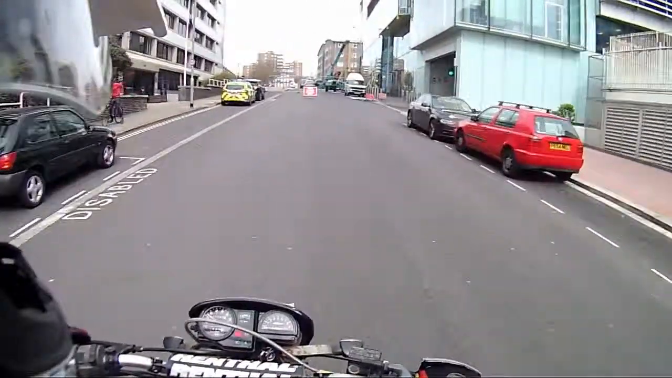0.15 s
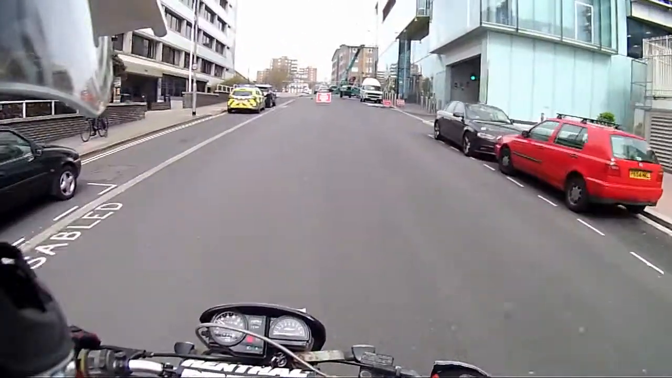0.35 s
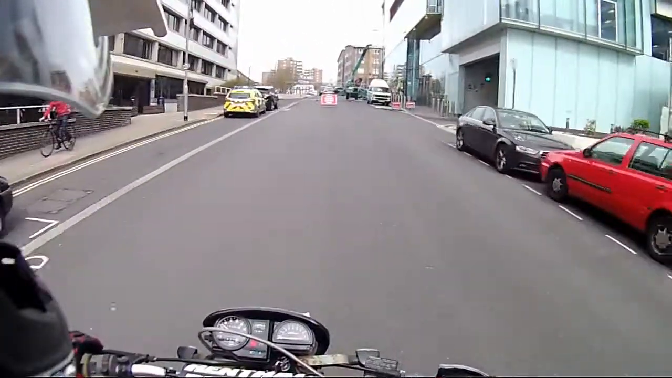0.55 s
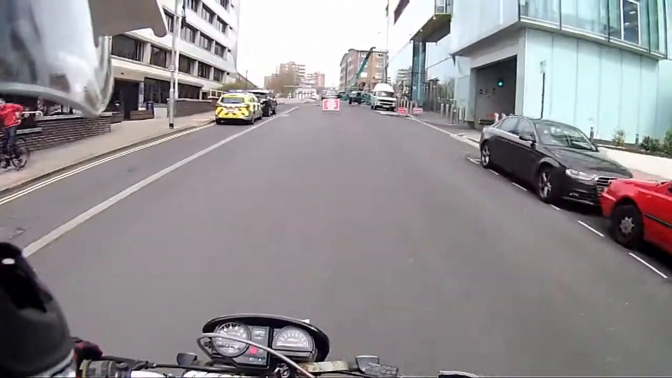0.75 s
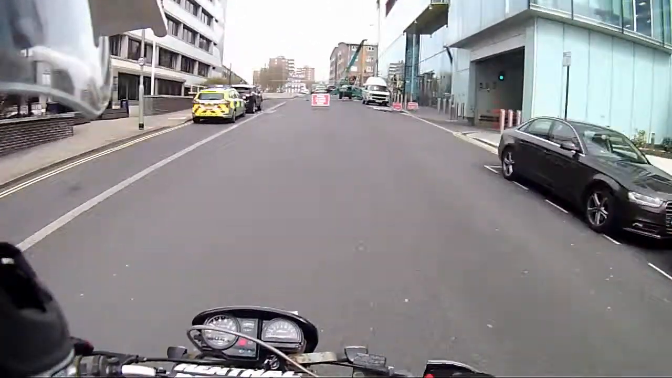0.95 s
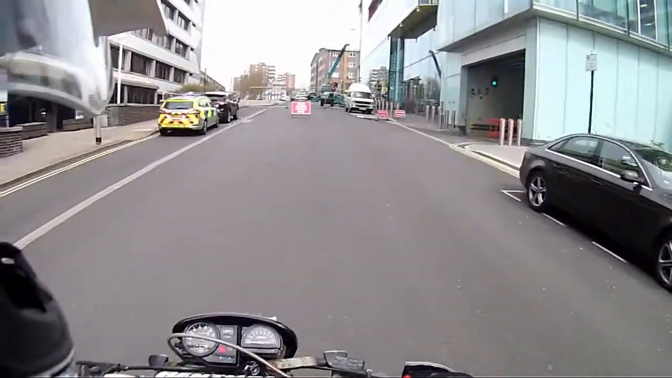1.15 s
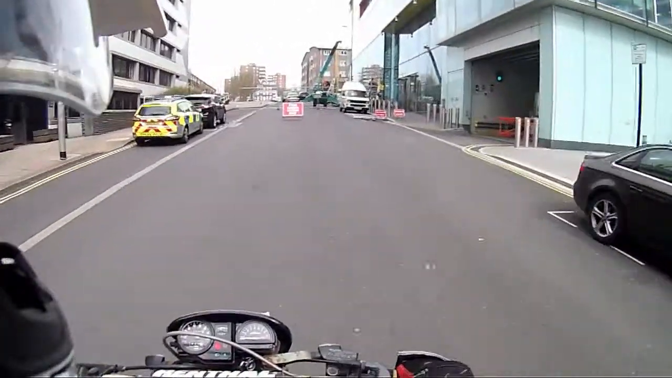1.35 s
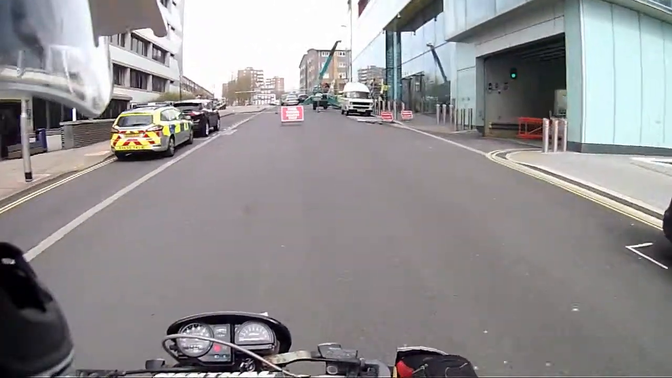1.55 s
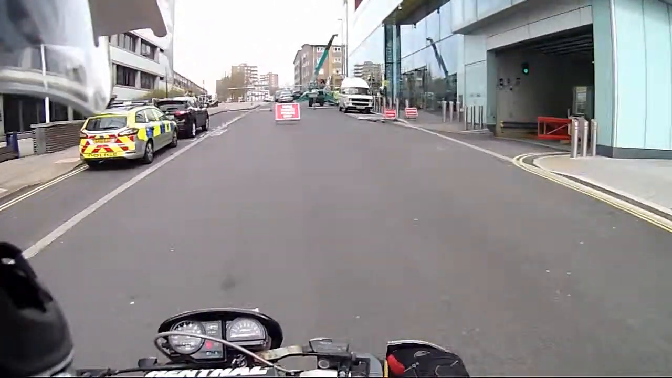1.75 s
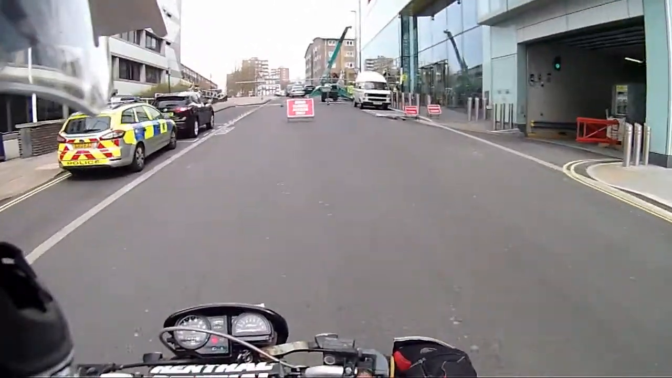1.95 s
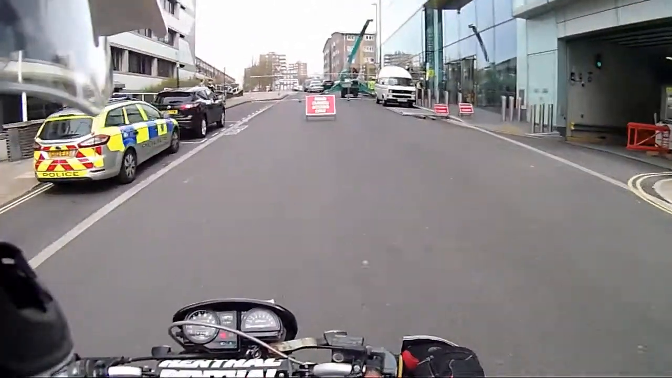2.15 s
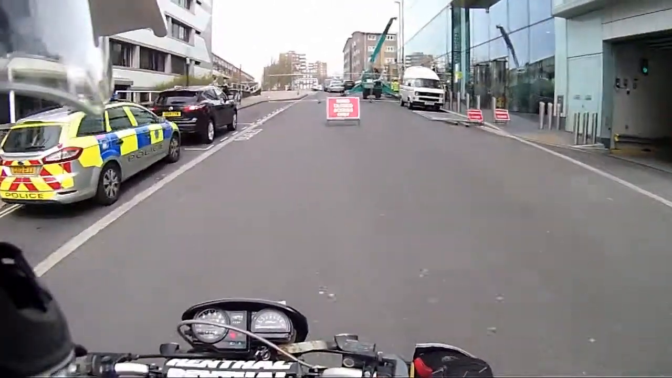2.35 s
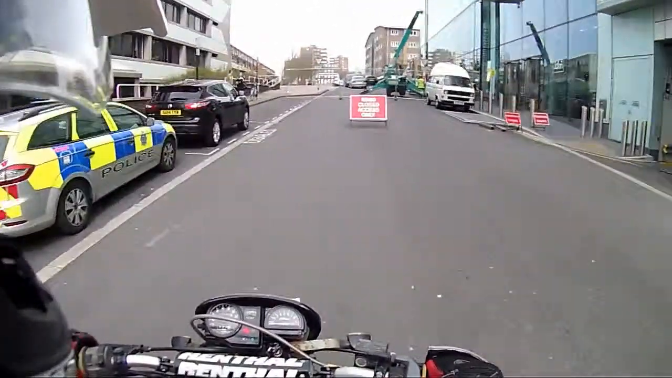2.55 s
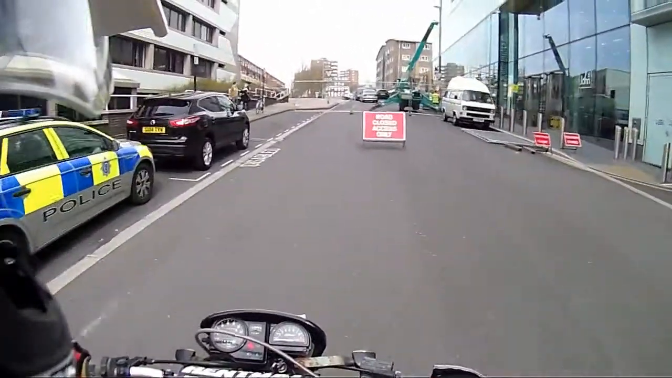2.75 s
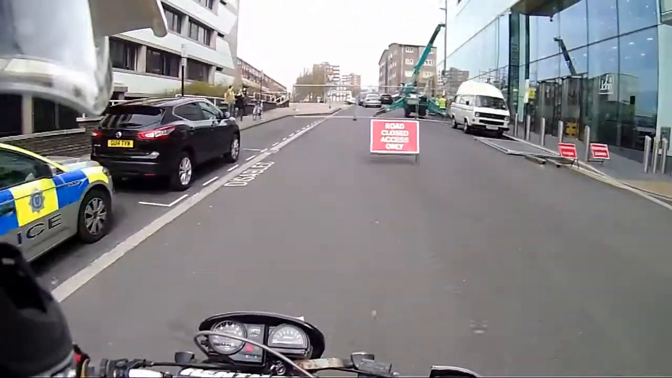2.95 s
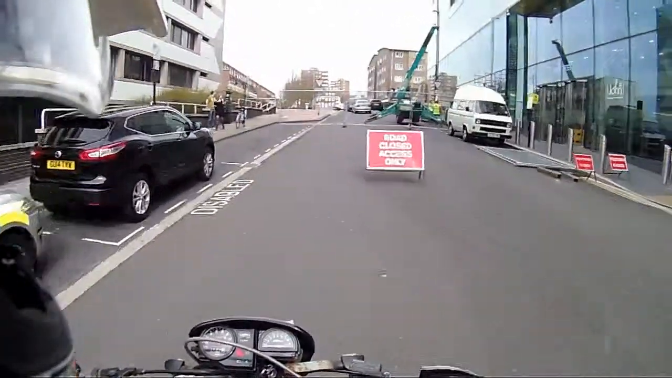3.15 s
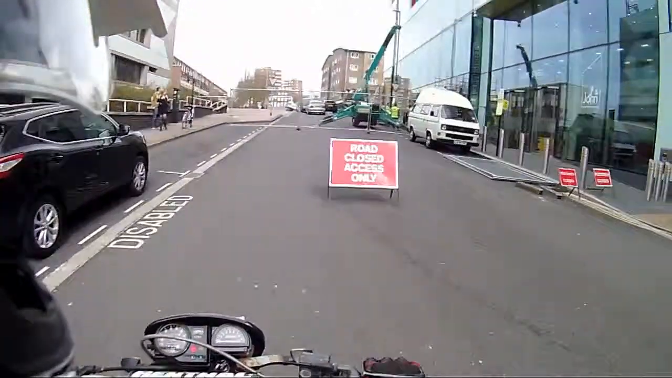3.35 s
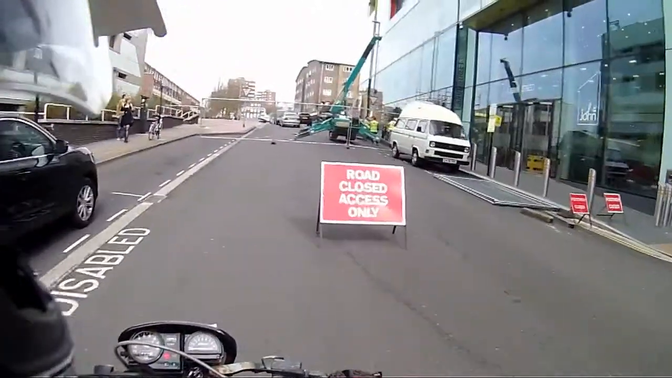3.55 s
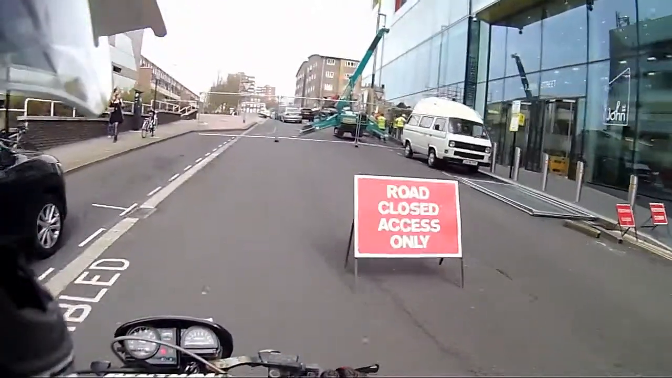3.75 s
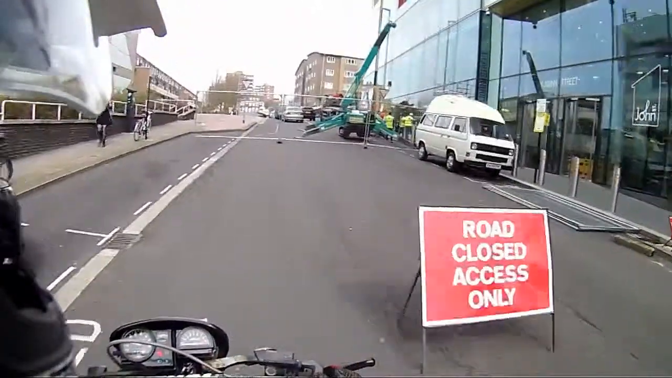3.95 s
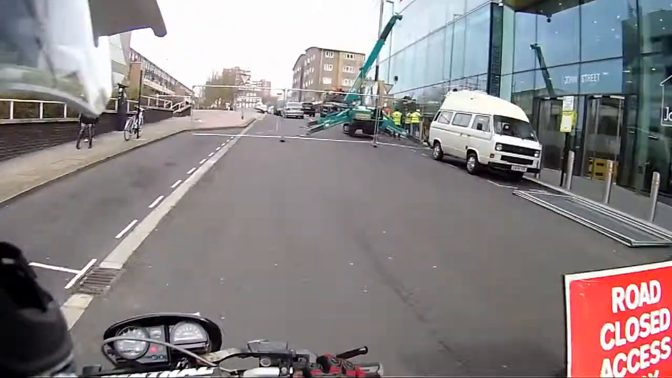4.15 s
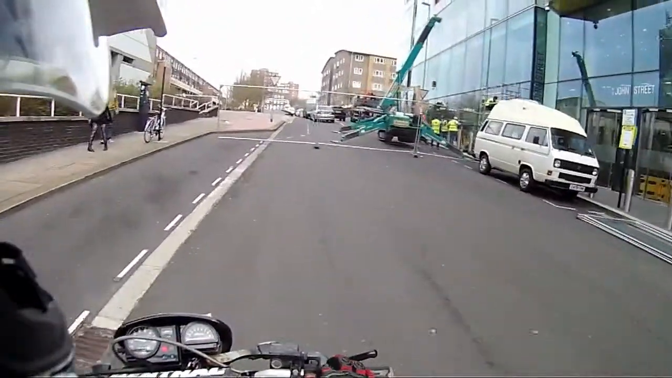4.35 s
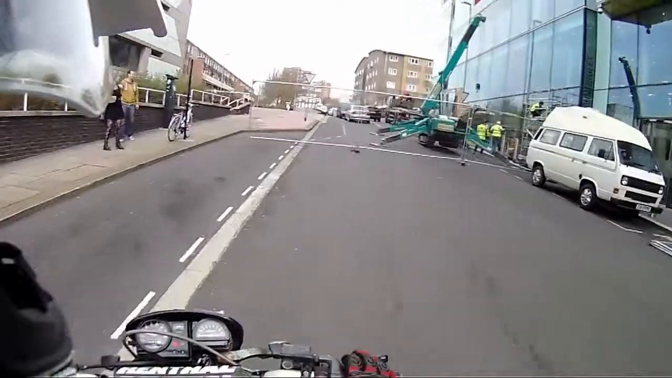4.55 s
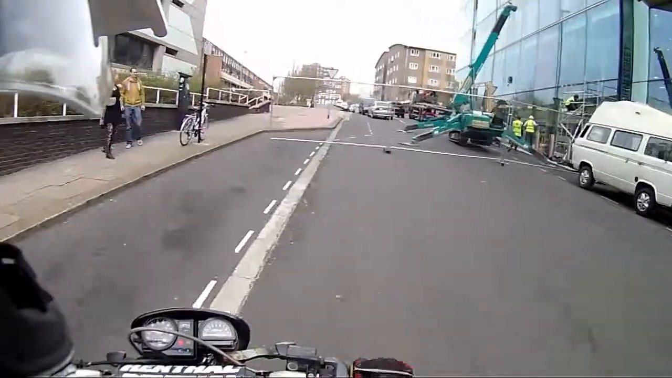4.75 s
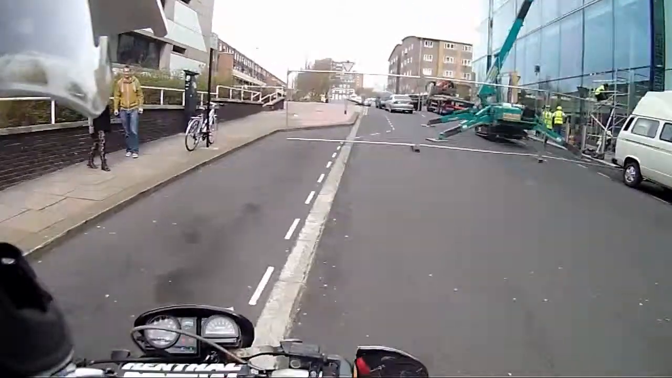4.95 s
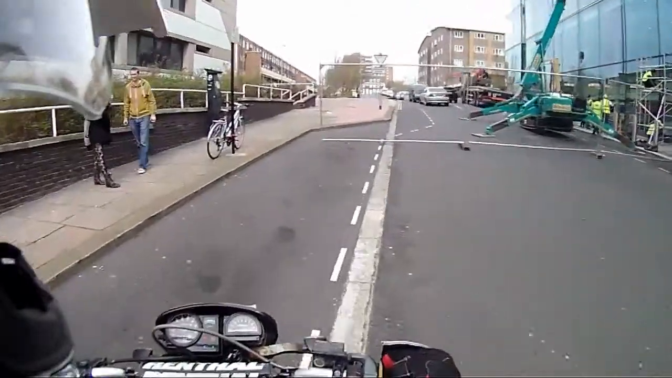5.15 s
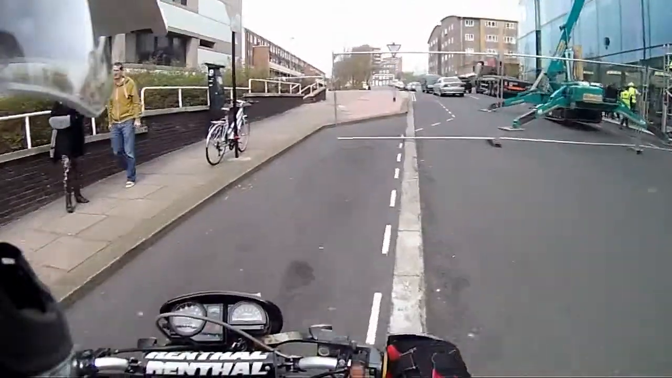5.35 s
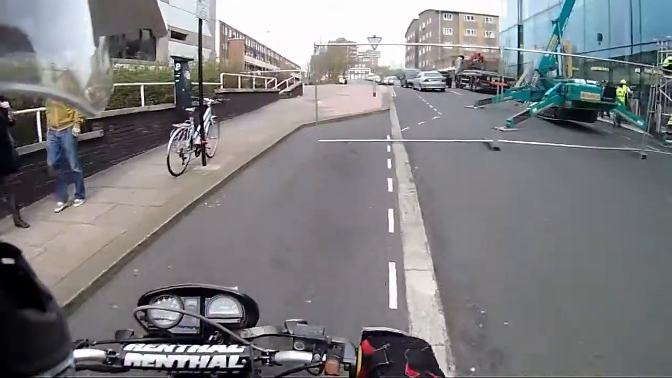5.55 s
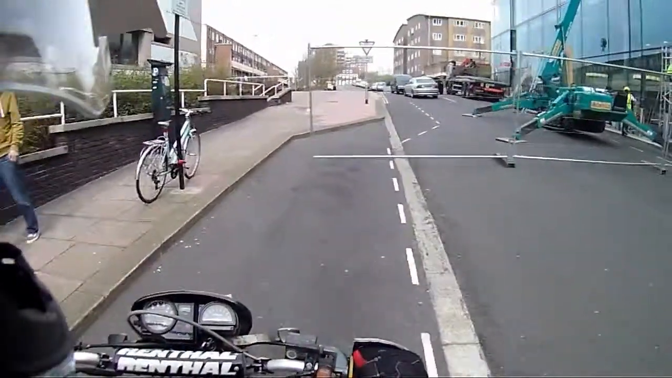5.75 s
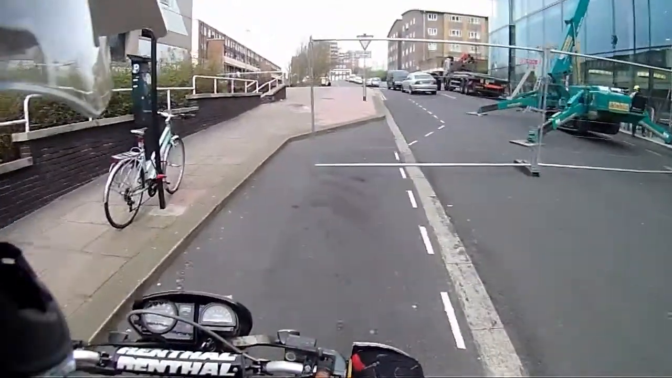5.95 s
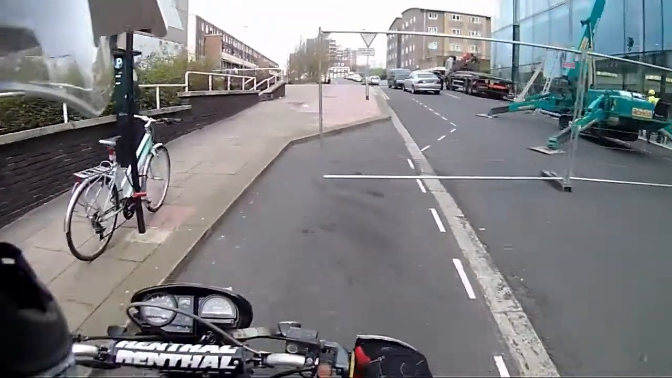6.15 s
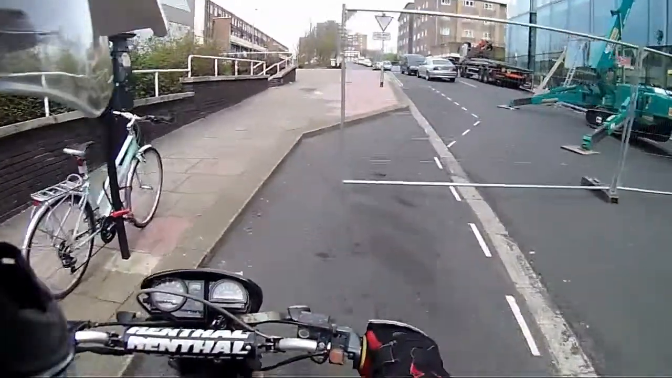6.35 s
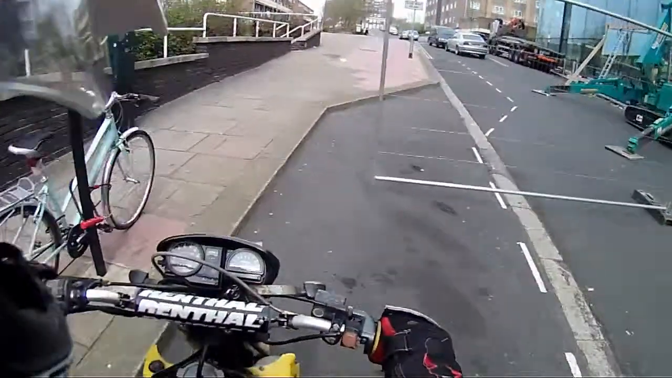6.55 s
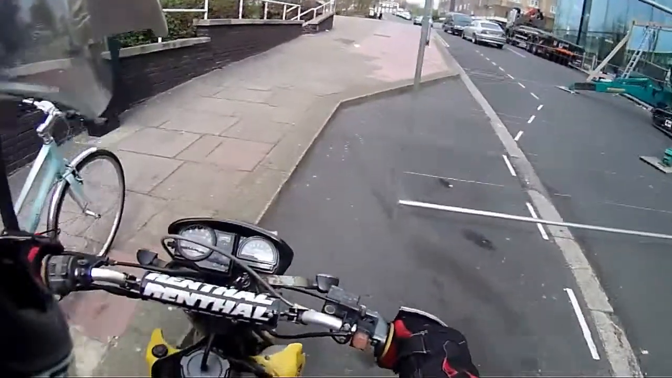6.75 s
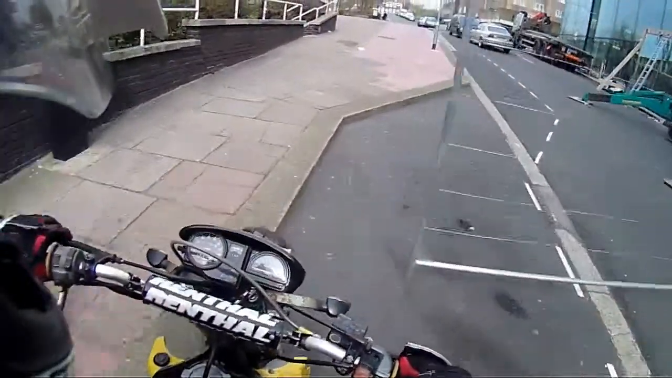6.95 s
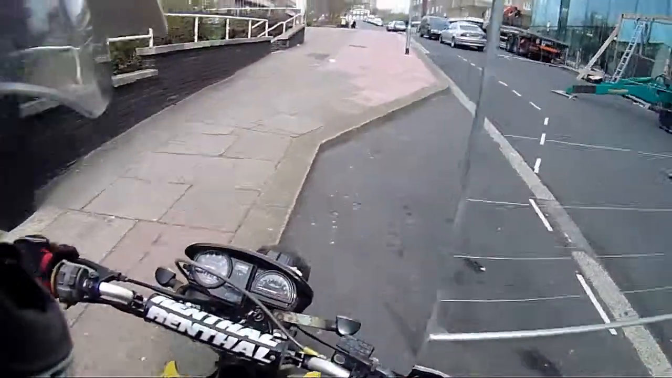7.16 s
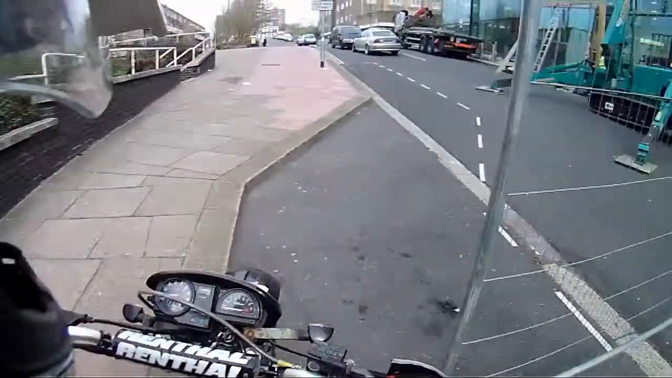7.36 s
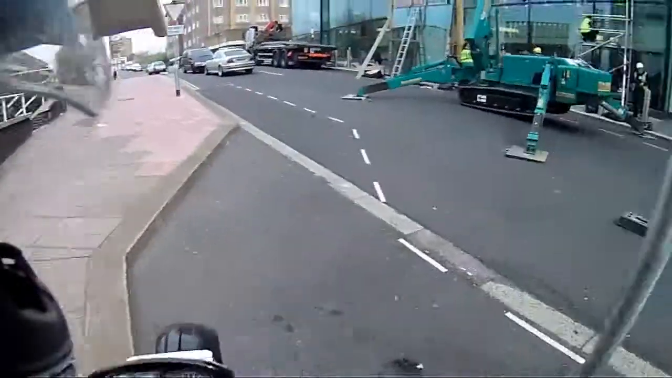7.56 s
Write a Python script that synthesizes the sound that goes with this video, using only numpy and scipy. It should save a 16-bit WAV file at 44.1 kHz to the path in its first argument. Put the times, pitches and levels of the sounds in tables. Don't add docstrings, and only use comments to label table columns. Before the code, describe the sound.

A single-cylinder motorcycle slows on a closed throttle, its droning engine sinking in pitch and fading while wind buffets the rider's helmet microphone.

```python
import sys
import numpy as np
from scipy import signal
from scipy.fft import rfft, irfft
from scipy.io import wavfile
from scipy.ndimage import uniform_filter1d

SR = 44100
rng = np.random.default_rng(int(sys.argv[2]) if len(sys.argv) > 2 else 0)


def wav_out(sig):
    wavfile.write(sys.argv[1], SR, np.round(np.clip(np.atleast_2d(sig).T, -1, 1) * 32767).astype(np.int16))


def attenuation_scalar(level_db):
    decades = np.asarray(level_db, float) / 20
    return 10 ** decades


N = 335160
T = np.arange(N) / SR

# t/s, f/Hz
REVS = [(0.0, 78.0), (0.15, 77.8), (0.3, 76.5), (0.6, 71.5), (0.78, 72.0), (1.05, 70.6), (1.15, 70.2),
        (1.375, 67.3), (1.5, 67.1), (1.875, 63.4), (2.375, 59.6), (2.75, 55.6), (3.0, 52.5), (3.5, 47.2),
        (4.0, 41.2), (4.2, 39.9), (4.5, 39.2)]
# t/s, roar level/dB, tyre hiss level/dB
BIKE = [(0.0, -35, -46), (0.27, -35, -49), (0.61, -35, -51), (1.97, -37.5, -53), (2.5, -40, -54.5),
        (3.3, -41, -55), (4.15, -42.5, -57), (4.4, -41, -58), (4.7, -44, -60), (5.02, -46, -64),
        (5.3, -46, -62.5), (5.95, -51, -70), (6.3, -49, -68.5), (7.0, -54.5, -70.5), (7.28, -52.5, -64.5),
        (7.4, -55.5, -69), (7.6, -56, -67)]


def curves(table):
    s, *columns = np.transpose(table)
    return [np.interp(T, s, c) for c in columns]


def on_log(points, f):
    hz, db = np.transpose(points)
    return np.interp(np.log(f), np.log(hz), db, left=-90)


def noise():
    return rng.standard_normal(N)


def colour(x, points):
    f = np.arange(N // 2 + 1) * SR / N + 1e-3
    y = irfft(rfft(x) * attenuation_scalar(on_log(points, f)), N)
    return y / np.std(y)


def band(low_hz, high_hz):
    sos = signal.butter(2, [low_hz, high_hz], "bandpass", fs=SR, output="sos")
    y = signal.sosfilt(sos, noise())
    return y / np.std(y)


def walk(rate):
    k = int(SR / rate)
    held = np.repeat(rng.standard_normal(N // k + 1), k)
    return 1.3 * uniform_filter1d(uniform_filter1d(held, k), k)[:N]


def bursts(rows):
    bite_s, ease_s = 0.023, 0.027
    gain = 0
    for s, length, db in rows:
        corners = np.cumsum([s - bite_s, bite_s, length, ease_s])
        gain = gain + attenuation_scalar(db) * np.interp(T, corners, [0, 1, 1, 0])
    return gain


def bike():
    hz, free = crank()
    turns = np.cumsum(hz) / SR
    roar_db, hiss_db = curves(BIKE)
    rise = np.clip(hz - REVS[-1][1], 0, None)
    puff = 0.64 + 0.29 * np.exp(-(turns % 1) / 0.21)
    knock_db = -6.5 + 3.5 * free + 0.0307 * rise
    knock = 1.14 * attenuation_scalar(knock_db) * (0.41 + 0.44 * free) * orders(hz, turns)
    ring = engine_ring(puff, free, rise)
    block = attenuation_scalar(roar_db) * (knock + roar(puff, free) + ring)
    casing = covers(gear_whine(turns, free) + attenuation_scalar(roar_db - 14.5) * ring)
    return block + casing + tyre_hiss(puff, hiss_db) + fins(hiss_db)


def crank():
    clutch_s, idle_hz, settle_s = 4.5, 26, .4
    # t/s, dip to surge/s, swing f/Hz
    snatches = [(.14, .05, 1.3), (.3, .07, 1.2), (.55, .04, .9), (.685, .07, 2), (1.13, .06, 1.2),
                (1.275, .05, .9), (1.43, .12, .9), (2.03, .07, 1.3), (2.25, .2, 1.1), (2.57, .18, 1.7),
                (2.78, .08, .8), (2.97, .2, 1.2)]
    free = np.exp(-np.clip(T - clutch_s, 0, None) / settle_s)
    swing = 0
    for s, span, hz in snatches:
        u = (T - s) / span
        swing = swing + hz * 2 * u * np.exp(.5 - 2 * u ** 2)
    return idle_hz + (curves(REVS)[0] + swing - idle_hz) * free, free


def orders(hz, turns):
    # f/Hz, level/dB over the roar
    frame = [(120, -11.5), (240, -4.5), (295, -4.5), (350, -9), (410, -12), (480, -11), (580, -12),
             (660, -15), (790, -12), (880, -31), (1050, -28.5), (1230, -17.5), (1420, -15.5), (1600, -50)]
    # f/Hz, width/Hz, lift level/dB
    sharp = [(380, 42, 2), (617, 34, 3.5), (804, 34, 1)]
    # from t/s, to t/s, crank order
    standouts = [(0, .5, 5), (0, .45, 8), (0, .3, 18), (.1, .5, 19), (0, .5, 6), (.5, .8, 8), (1.2, 1.6, 5),
                 (1.2, 1.6, 8), (2.05, 2.45, 4), (2.1, 2.45, 10), (.42, .62, 17), (.6, 1.7, 6), (.8, 1.2, 8),
                 (.8, 1.05, 9), (1.2, 1.6, 21), (2.3, 2.55, 21), (1.75, 2.0, 22), (2.4, 2.55, 19),
                 (3.75, 4.05, 14), (1.8, 2.0, 19), (4.1, 4.4, 16), (1.15, 1.65, 4), (1.65, 1.95, 21),
                 (1.75, 2.5, 5), (1.8, 2.15, 9), (1.85, 2.2, 13), (2.3, 2.5, 11), (2.85, 3.75, 12),
                 (3, 3.45, 8), (3.45, 4.2, 13), (4.05, 4.4, 20), (4.1, 4.45, 18), (4.5, 4.75, 17),
                 (5, 5.25, 18)]
    standout_db, tremble_db, tremble_rad = 7, 1.3, .3
    coarse = 10
    t, hz, turns = T[::coarse], hz[::coarse], turns[::coarse]
    out = 0
    for k in range(2, 28):
        gates = [np.clip(np.minimum(t - a + .05, b - t) / .08, 0, 1) for a, b, order in standouts if order == k]
        lift = standout_db * sum(gates)
        for mode_hz, width, mode_db in sharp:
            lift = lift + mode_db * np.exp(-((k * hz - mode_hz) / width) ** 2)
        fade, drift = (np.interp(t, np.arange(64) / 8, rng.standard_normal(64)) for _ in range(2))
        shiver, slip = (np.interp(t, np.arange(256) / 32, rng.standard_normal(256)) for _ in range(2))
        db = on_log(frame, k * hz) - .5 + lift + 2.2 * fade + tremble_db * shiver
        phase = 2 * np.pi * k * turns + k ** 2 + (.7 + .06 * k) * drift + tremble_rad * slip
        out = out + attenuation_scalar(db) * np.sin(phase)
    return signal.resample_poly(out, coarse, 1)[:N]


def roar(puff, free):
    # f/Hz, level/dB per Hz
    roar_spectrum = [(120, -6), (200, -6), (290, -1), (323, -2.5), (400, -2.5), (465, -1.5), (613, -2.5),
                     (900, -11), (1170, -40), (1980, -120)]
    idle_thin, idle_cut_hz = .4, 520
    out = attenuation_scalar(-5.5 + 1.5 * walk(12)) * colour(puff * noise(), roar_spectrum)
    low = signal.sosfiltfilt(signal.butter(2, idle_cut_hz, fs=SR, output="sos"), out)
    return out - idle_thin * (1 - free) * low


def engine_ring(puff, free, rise):
    # f/Hz, level/dB per Hz
    ring_spectrum = [(530, -34), (900, -4.5), (1020, 1), (1110, -2), (1320, -1), (1420, -1), (1540, -4.5),
                     (1800, -11.5), (2340, -56), (3960, -120)]
    lull_s, lull_span_s, lull_db = 4.41, 0.38, -0.5
    ring_db = -18 + 5 * free - 0.1267 * rise
    ring_db = ring_db + lull_db * np.exp(-((T - lull_s) / lull_span_s) ** 2)
    return attenuation_scalar(ring_db + 1.5 * walk(11)) * colour(puff * noise(), ring_spectrum)


def gear_whine(turns, free):
    # t/s, level/dB
    mesh = [(0.0, -54), (0.35, -55), (0.46, -47), (0.7, -49.5), (1.15, -46.5), (1.35, -46.5), (1.6, -51),
            (1.95, -50.5), (2.4, -50), (2.7, -54.5), (3.1, -55.5), (3.4, -59), (4.5, -51)]
    mesh_order = 20
    wobble = .5 * np.sin(2 * np.pi * turns) + .3 * np.sin(np.pi * turns) + 1.2 * walk(6)
    level = attenuation_scalar(curves(mesh)[0] - 7.5 + 1.0 * walk(8.1)) * free ** 4
    return level * np.sin(2 * np.pi * mesh_order * turns + wobble)


def covers(x):
    # f/Hz, width/Hz, gain
    modes = [(1435, 75, 5.0), (1240, 50, 2.5), (1150, 40, 2.5), (1045, 45, 2.5)]
    out = x
    for hz, width, gain in modes:
        out = out + gain * signal.lfilter(*signal.iirpeak(hz, hz / width, fs=SR), x)
    return out


def tyre_hiss(puff, hiss_db):
    # f/Hz, level/dB per Hz
    hiss_spectrum = [(1060, -15), (1800, 1.5), (2470, -1.5), (2650, -3), (3410, -7), (3700, -11),
                     (5070, -6.5), (5700, -9), (6180, -10.5), (7330, -8.5), (10200, -13), (11900, -21),
                     (14800, -25), (15500, -25)]
    return attenuation_scalar(hiss_db + 0.05 * walk(21.0) + 1.2 * walk(40)) * colour(puff * noise(), hiss_spectrum)


def fins(hiss_db):
    # f/Hz, width/Hz, level/dB over hiss, glide per s
    metal = [(2430, 110, -13, -.004), (4800, 200, -17, 0), (5800, 200, -16, -.012), (6700, 120, -20, 0),
             (7900, 120, -19, -.003), (9080, 150, -21, 0)]
    # t/s, level/dB
    loudest = [(0.0, -52.5), (0.44, -56), (0.49, -59), (2.82, -65.5), (4.25, -58.5), (4.9, -87), (7.6, -76)]
    # t/s, length/s, level/dB
    struck = [(5.72, .02, -68), (6.08, 0.033, -63), (6.41, .03, -71), (6.72, .04, -72)]
    out = (attenuation_scalar(curves(loudest)[0]) + bursts(struck)) * attenuation_scalar(-3.0 + 1.6 * walk(30)) * band(6980, 7860)
    for hz, width, db, glide in metal:
        stir = uniform_filter1d(noise(), size=int(SR / width))
        swell = 3.0 * walk(3)
        tone = np.sin(2 * np.pi * hz * (T + glide * T ** 2 / 2))
        out += attenuation_scalar(hiss_db + db + swell) * stir / np.std(stir) * tone
    return out


def rasp():
    fade_s, decay_turns = 0.32, 0.3
    turns = np.cumsum(crank()[0]) / SR
    return attenuation_scalar(-45) * np.exp(-(T / fade_s) ** 2 - (turns % 1) / decay_turns) * band(2560, 3300)


def wind():
    # t/s, level/dB, air speed past the housing 0-1
    air = [(0.0, -24.5, 1), (0.25, -26.5, 0.47), (1.05, -27.5, 0.73), (1.7, -21.5, 0.88),
           (2.05, -24.5, 0.61), (2.33, -33, 0.86), (2.9, -32, 0.69), (3.3, -29.5, 0.3), (3.6, -26, 0.59),
           (3.83, -33, 0.23), (3.95, -22, 0.5), (4.75, -30, 0.61), (5.05, -34, 0.23), (5.3, -35.5, 0.05),
           (6.05, -39.5, 0.24), (6.45, -35.5, 0.92), (6.7, -40, 0.65), (6.92, -47, 0.22)]
    # t/s, slow swing level/dB, flutter level/dB
    gusts = [(.1, 5, 6.5), (.45, 0, 1), (.72, -2.5, 3.5), (1.04, 2.5, -9), (1.13, -3, 5), (1.78, 1.5, -1),
             (1.84, 0.5, -2), (1.92, -1.5, 1), (2.64, -2, 3), (2.92, 0, -17), (3.02, -5.5, 6),
             (3.07, 9.5, 3.5), (3.13, -8.5, -3), (3.22, 1, -7), (3.49, -6, -0.5), (3.58, -6, -1),
             (3.89, 11, -6.5), (3.94, -12, 4), (4.03, -2.5, 0), (4.38, -2, 9), (4.68, 5.5, 8.5),
             (4.72, 1, -7.5), (4.78, -2.5, 4.5), (4.9, 4.5, -16), (5.12, 10.5, 8), (5.54, 3.5, 0.5),
             (5.84, 11, 4.5), (5.91, -6, 3), (5.65, 2, 4), (6.0, 3.5, 5), (6.1, 5, 4.5), (6.3, -5, 1),
             (6.93, -1.5, -10), (7.1, -3, -4), (7.19, 2, -1.5), (7.49, 6, 3)]
    # f/Hz, level/dB per Hz
    fast_spectrum = [(7.1, 20), (12, 4.5), (50, -0.5), (120, -4), (160, -23.5), (260, -120)]
    slow_spectrum = [(7.1, -28), (12, -9), (22, -1), (38, 1), (52, -3), (76, -15), (120, -21), (160, -81),
                     (260, -120)]
    flutter_spectrum = [(47, -39), (80, -3), (145, -3), (215, -9), (269, -12.5), (442, -29), (500, -24),
                        (650, -47), (1100, -120)]
    gust_s = 0.051
    slow_flutter_hz, slow_dull = 173, 0.52
    wind_db, pace = curves(air)
    pace = np.clip(pace, 0, 1)
    s, *lifts = np.transpose(gusts)
    coarse = T[::64]
    bumps = np.exp(-((coarse[:, None] - s) / gust_s) ** 2)
    swing_db, flap_db = (np.interp(T, coarse, bumps @ db) for db in lifts)
    flutter_db = wind_db - 12.5 + 9 * pace + flap_db
    fast = np.sqrt(pace) * colour(noise(), fast_spectrum)
    slow = np.sqrt(1 - pace) * colour(noise(), slow_spectrum)
    buffet = fast + slow
    suction = 0.04 * (buffet ** 2 - uniform_filter1d(buffet ** 2, size=4096))
    eddies = 1.5 * walk(35)
    flutter = colour(noise(), flutter_spectrum)
    sos = signal.butter(2, slow_flutter_hz, "highpass", fs=SR, output="sos")
    flutter = flutter - slow_dull * (1 - pace) * signal.sosfiltfilt(sos, flutter)
    pulses, churn = slaps()
    swings = churn * attenuation_scalar(wind_db + swing_db) * (buffet - suction)
    return pulses + swings + np.sqrt(churn) * attenuation_scalar(flutter_db + eddies) * flutter


def slaps():
    # t/s, peak level/dB, half-height width/s
    torn = [(0.063, -17, 0.0082), (0.11, -16.0, 0.0056), (0.369, -15.5, 0.0042), (0.819, -17.5, 0.0038),
            (1.228, -16, 0.0041), (1.633, -13.5, 0.006), (1.738, -14.5, 0.0065), (1.821, -12.5, 0.0058),
            (2.059, -14.5, 0.0054), (2.38, -21.5, 0.0032), (2.53, -27.0, 0.0074), (2.725, -22, 0.0041),
            (2.8, -23.5, 0.0049), (2.885, -25, 0.0054), (3.071, -28, 0.0079), (3.208, -20, 0.0041),
            (3.368, -22, 0.0068), (3.42, -18, 0.0046), (3.494, -16.5, 0.0046), (3.682, -20, 0.0076),
            (3.898, -17, 0.0084), (3.969, -12.5, 0.0084), (4.14, -15.5, 0.0047), (4.329, -15, 0.0039),
            (4.574, -19, 0.0041), (4.65, -19, 0.0037), (4.689, -26, 0.0039), (4.911, -22.5, 0.0071),
            (5.029, -20, 0.005), (5.107, -22, 0.011), (5.388, -25.5, 0.009), (5.595, -25.4, 0.0039),
            (5.627, -26.5, 0.0052), (5.829, -21.5, 0.014), (6.069, -28, 0.0069), (6.134, -26, 0.0042),
            (6.164, -26.5, 0.0053), (6.257, -25, 0.0083), (6.609, -28.5, 0.0034), (6.712, -31, 0.006),
            (7.486, -30.5, 0.014), (7.572, -40, 0.01)]
    calm, span = 0.77, 2.14
    pulses = attenuation_scalar(-17) * np.exp(-T / 0.0026)
    churn = np.ones(N)
    for s, db, width in torn:
        near = slice(int(s * SR) - 2048, int(s * SR) + 2048)
        u = ((T[near] - s) / width) ** 2
        pulses[near] -= attenuation_scalar(db) * (1 - 1.86 * u) * np.exp(-1.3 * u)
        churn[near] *= 1 - calm * np.exp(-u / span ** 2)
    return pulses, churn


def rattles():
    # t/s, dull level/dB, bright level/dB
    bumps = [(0.17, -31, -42), (0.326, -30.5, -39), (0.5415, -31, -41), (0.704, -42, -42),
             (0.848, -31, -44), (1.29, -35, -42), (1.6794, -51, -45), (2.627, -39, -47),
             (2.784, -34.5, -58), (3.383, -37.5, -50), (3.5594, -44, -47), (3.713, -38, -53),
             (4.3, -45, -45), (4.704, -49, -63), (5.02, -50, -57), (5.2739, -52, -54), (5.721, -45, -57),
             (5.789, -47, -51), (5.851, -42, -59), (6.1644, -63, -54), (7.0314, -52, -56),
             (7.1574, -58, -70), (7.443, -52, -66)]
    # t/s, dull level/dB, bright level/dB, length/s
    scrapes = [(3.151, -38, -56, 0.041), (3.611, -34, -49, 0.038), (5.401, -50, -51, 0.024),
               (6.051, -51, -56, 0.024), (6.0781, -49, -57, 0.054), (6.416, -46, -54, 0.039),
               (6.708, -61, -63, 0.029), (6.731, -51, -55.5, 0.033), (7.24, -51, -65, 0.071),
               (7.369, -52, -56, 0.026), (7.459, -49, -59, 0.04)]
    # t/s, peak level/dB, f/Hz
    shell = [(4.431, -43, 720), (5.856, -51, 708), (7.034, -52, 537), (7.267, -49, 805), (7.284, -51, 643),
             (7.368, -50.5, 1030), (7.418, -43.5, 226)]
    # f/Hz, level/dB per Hz
    kit_spectrum = [(350, -29), (600, -6), (978, 4.5), (1140, 2.5), (2010, -6), (2640, -6.5), (3050, -7.5),
                    (3500, -9), (4030, -15.5), (5400, -12), (6300, -14), (7100, -9), (8300, -9),
                    (9300, -13.5), (11000, -17), (15000, -32)]
    tick_s = 0.013
    dull, bright, knocks = np.zeros((3, N))
    for s, dull_db, bright_db, length in [(*row, tick_s) for row in bumps] + scrapes:
        i = int(s * SR)
        age = T[:min(4096, N - i)]
        shape = np.minimum(age / .0015, 1) * np.exp(-(age / max(length, .002)) ** 3)
        dull[i:i + len(age)] += attenuation_scalar(dull_db - 11.0) * shape
        bright[i:i + len(age)] += attenuation_scalar(bright_db - 9.0) * shape
    age = T[:2048]
    for s, db, hz in shell:
        i = int(s * SR)
        knocks[i:i + 2048] += attenuation_scalar(db) * np.exp(-age / 0.0082) * np.sin(2 * np.pi * hz * age)
    kit = attenuation_scalar(3.2 * walk(400)) * colour(noise(), kit_spectrum)
    low = signal.sosfilt(signal.butter(4, 4800, "lowpass", fs=SR, output="sos"), kit)
    high = signal.sosfilt(signal.butter(4, 4800, "highpass", fs=SR, output="sos"), kit)
    return dull * low + bright * high / np.std(high) + knocks


def brake_pads():
    # t/s, length/s, level/dB
    bites = [(0, 0.0067, -59), (.53, .03, -62), (1.28, 0.028, -60), (3.155, 0.021, -56), (4.0, 0.44, -61),
             (4.5, .12, -54.5), (5.05, .07, -64), (5.19, .03, -74), (5.4, .05, -75), (5.55, 0.074, -70),
             (6.08, 0.2, -67), (6.24, 0.043, -60), (6.3, 0.15, -60.5), (6.5, 0.051, -59),
             (6.56, 0.33, -67.5), (7.02, .1, -65), (7.23, 0.11, -62.5), (7.46, 0.084, -65)]
    # f/Hz, level/dB per Hz
    pad_spectrum = [(2350, -44), (4000, -7), (4850, -3), (6220, -26), (7400, -4), (8800, -7), (9700, 0.5),
                    (11200, -2), (12300, -12), (15500, -11)]
    drag_db = -14.5
    contact = attenuation_scalar(curves(BIKE)[1] + drag_db) + bursts(bites)
    return contact * attenuation_scalar(-5.5 + 0.65 * walk(30)) * colour(noise(), pad_spectrum)


def leather():
    # t/s, length/s, from f/Hz, to f/Hz, level/dB
    chirps = [(3.29, 0.065, 11700, 10300, -66), (3.37, .04, 10500, 11300, -60),
              (5.547, .06, 10000, 11000, -70), (6.972, .015, 9700, 11180, -70),
              (7.057, .022, 12400, 13900, -68), (7.065, .045, 10000, 9850, -67),
              (7.12, .015, 9800, 9710, -68), (7.138, .008, 12600, 13300, -70),
              (7.155, .025, 9900, 9100, -67), (7.196, .055, 9300, 11000, -64),
              (7.273, .02, 11900, 10400, -64), (7.262, .015, 14200, 13800, -70),
              (7.3, .03, 13600, 12000, -68), (7.31, 0.019, 10800, 9800, -68),
              (7.303, 0.018, 4700, 4500, -60)]
    # t/s, length/s, centre f/Hz, level/dB
    judders = [(3.252, .04, 10800, -68), (3.3, .05, 11300, -68), (3.425, 0.061, 10900, -63),
               (3.45, .04, 12000, -68), (3.47, .07, 10700, -67), (3.556, .06, 11000, -66),
               (3.57, .03, 12000, -69), (5.05, .08, 10500, -67), (5.07, .04, 11800, -64),
               (5.188, 0.035, 12500, -67), (5.19, .02, 10800, -72), (5.257, 0.095, 10600, -68),
               (5.27, .07, 11400, -84), (5.35, .02, 11200, -79), (5.394, .04, 11300, -68),
               (5.435, .02, 10700, -70), (5.58, .03, 10700, -69)]
    chirp_stutter, judder_stutter = 0.25, 1.3
    rubs = [(*row, chirp_stutter) for row in chirps]
    rubs += [(s, length, hz, hz, db, judder_stutter) for s, length, hz, db in judders]
    out = np.zeros(N)
    slip, grip = walk(500), walk(350)
    for s, length, from_hz, to_hz, db, stutter in rubs:
        i, n = int(s * SR), int(length * SR)
        hz = np.linspace(from_hz, to_hz, n) * (1 + .07 * stutter * slip[i:i + n])
        level = attenuation_scalar(db - 1.5 + 3.7 * stutter * grip[i:i + n]) * np.hanning(n) ** .3
        out[i:i + n] += level * np.sin(2 * np.pi * np.cumsum(hz) / SR)
    return out


def ticks():
    # t/s, peak level/dB
    clicks = [(3.3403, -50), (3.8431, -52), (3.8671, -49), (3.892, -52), (3.915, -48), (3.9394, -48),
              (4.135, -48), (4.3011, -39), (4.4183, -48), (4.995, -56), (5.2714, -48), (5.3996, -54),
              (5.412, -54), (5.7952, -55), (6.06, -56), (6.083, -53), (6.097, -53), (6.112, -54),
              (6.1644, -55), (6.42, -55), (6.433, -53), (6.448, -54), (6.715, -58), (6.735, -55),
              (6.752, -55), (6.8556, -59), (6.882, -60), (6.892, -56), (6.908, -61), (6.9289, -54),
              (7.1579, -50), (7.2003, -55), (7.228, -58.5), (7.244, -56), (7.3774, -54), (7.4518, -53),
              (7.5794, -49)]
    decay_s = .0015
    gain = np.zeros(N)
    for s, db in clicks:
        gain[int(s * SR):][:512] += attenuation_scalar(db - 7.0) * np.exp(-T[:512] / decay_s)
    return gain * band(4500, 10000)


def scene():
    return (bike() + wind() + rattles() + brake_pads() + leather() + rasp() + ticks())[None]


def low_pass(x):
    return signal.sosfilt(signal.butter(12, 15630, fs=SR, output="sos"), x)


def record(dry):
    # f/Hz, rms level/dB
    electronics = [(15219, -99), (15278, -90), (15336, -101), (15395, -103)]
    port_hz, hiss_db = 17.4, -74
    whistle = sum(attenuation_scalar(db + 5.0) * np.sin(2 * np.pi * hz * T) for hz, db in electronics)
    dry = signal.sosfilt(signal.butter(2, port_hz, "highpass", fs=SR, output="sos"), dry)
    return low_pass(dry + whistle + attenuation_scalar(hiss_db) * noise())


dry = scene()
out = record(dry)
wav_out(out)
```